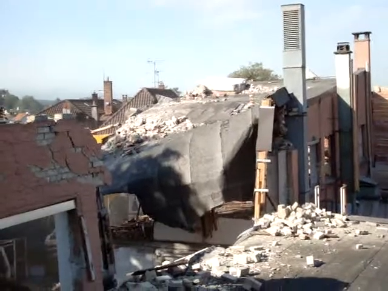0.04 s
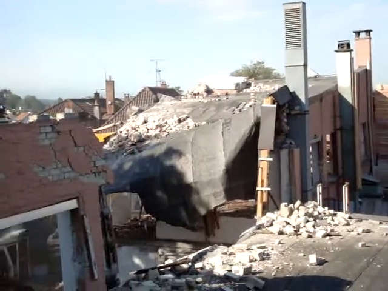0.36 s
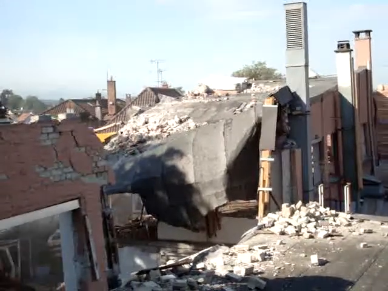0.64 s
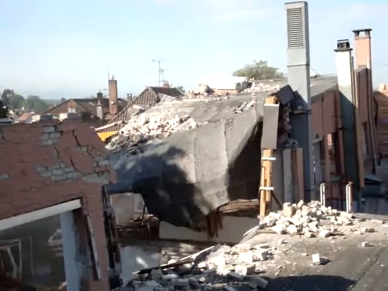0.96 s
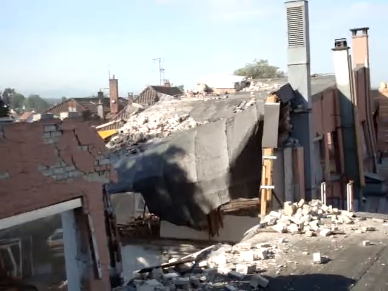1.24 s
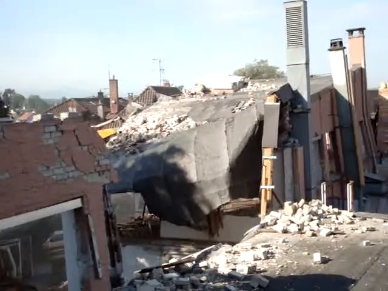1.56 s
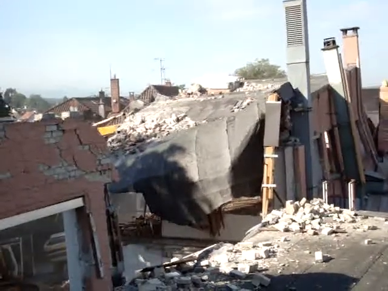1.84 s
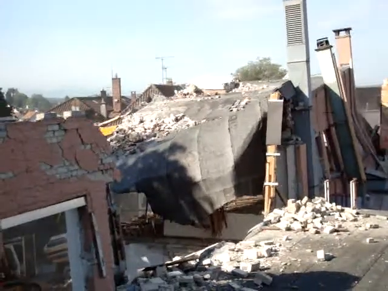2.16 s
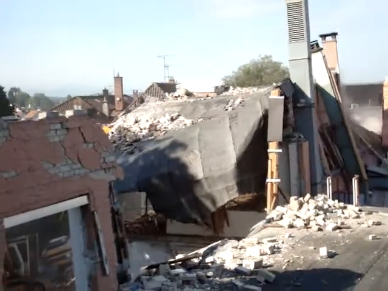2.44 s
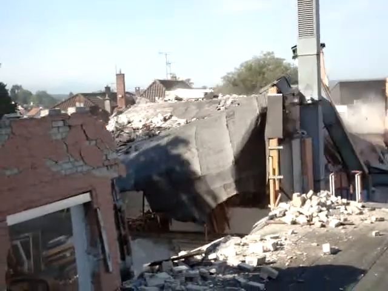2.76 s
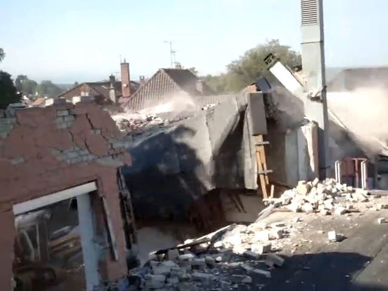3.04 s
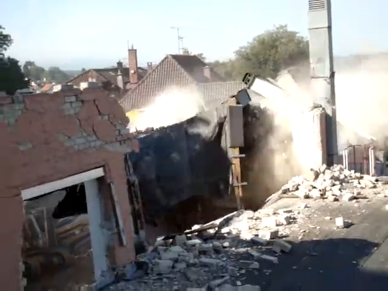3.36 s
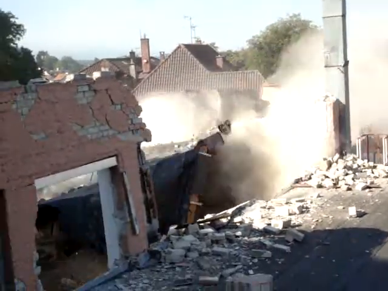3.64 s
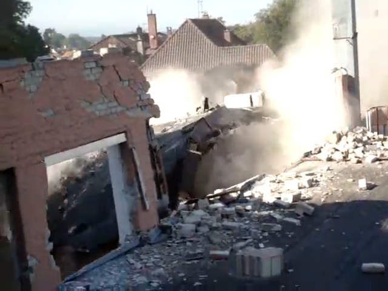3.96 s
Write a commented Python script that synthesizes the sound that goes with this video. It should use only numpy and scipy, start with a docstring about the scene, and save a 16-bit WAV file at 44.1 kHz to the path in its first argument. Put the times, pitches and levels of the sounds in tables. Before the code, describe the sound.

A brick building collapses outdoors. Rubble slides while timbers crack and a metal sheet crashes and scrapes over a faint excavator drone. Then louder surges of clinking bricks and dull thuds follow, caught by one nearby microphone.

```python
"""On a roof near a demolition site, an excavator pulls down a brick building.
Over the wavering engine drone, timbers crack and splinter, and a metal sheet crashes down, rings
and scrapes on. Then walls and roof give way in surges of rubble: a gritty wash full of ringing
stones and clinking bricks, with landing blocks, dull thuds and the rumble of the shaking structure.
One microphone, outdoors; gain control ducks the loud moments."""
import sys
import numpy as np
from scipy import signal
from scipy.fft import rfft, irfft
from scipy.io import wavfile

SR = 44100
rng = np.random.default_rng(int(sys.argv[2]) if len(sys.argv) > 2 else 0)


def store_pcm(level_fs):
    """Save levels as 16-bit WAV."""
    pcm = np.round(np.clip(level_fs, -1, 1) * 32767).astype(np.int16)
    wavfile.write(sys.argv[1], SR, np.atleast_2d(pcm).T)


N = 176400
TIME = np.arange(N) / SR
BIN_HZ = np.arange(N // 2 + 1) * SR / N

# surges of the sliding rubble: t/s, mid level/dB, upper-mid level/dB, treble level/dB
RUBBLE_SURGES = [(0, -28.5, -27.5, -37), (0.5, -29.5, -30.5, -37.5), (0.95, -31, -29, -39),
                 (1.15, -29, -28.5, -34), (1.3, -25, -26, -34.5), (1.5, -28, -28, -35.5),
                 (1.75, -28.3, -28.5, -36.5), (2.08, -27.5, -26, -36), (2.199, -21.5, -23.5, -32.5),
                 (2.55, -21, -22.5, -33.5), (2.641, -27.5, -23.5, -36), (2.72, -21.5, -23.5, -35),
                 (2.861, -22, -22.5, -33.5), (2.95, -19.5, -18, -29), (3.118, -22, -19.5, -33.5),
                 (3.21, -23.5, -21, -34), (3.39, -20, -18, -30), (3.52, -26, -24, -36),
                 (3.62, -18.5, -18, -31.5), (3.76, -21, -20, -33), (3.93, -26, -22.5, -36),
                 (4.0, -26, -20, -35)]
# spectrum of the rubble: f/Hz, level/dB
RUBBLE_COLOUR = [(130, -13), (175, -12.5), (240, -11), (310, -5.5), (430, -4.5), (850, -0.5), (1320, -1.3),
                 (1600, -5), (1900, -5), (2600, -4.5), (3200, -5.5), (4500, -10), (6200, -12.5),
                 (8000, -21), (10000, -30)]
# spectrum of breaking wood: f/Hz, level/dB
WOOD_COLOUR = [(300, -52), (1500, -15.5), (2300, 5.5), (3050, 9), (4100, 4.5), (4400, 4), (5200, 0),
               (6500, -11.5), (7700, -7.5), (10000, -18.5)]

# contact textures, from coarse to fine
FRAGMENTS = dict(per_s=190, spread_db=-3)
STONES = dict(per_s=640, spread_db=-3.5)
SPLINTERS = dict(per_s=660, spread_db=4, t60=0.017, share=0.19)


def rubble():
    """Sliding masonry: a gritty wash of fragments with ringing stones in it, in three size ranges."""
    bands = [(130, 1500), (1500, 4500), (4500, 11000)]  # band of each size range: low f/Hz, high f/Hz
    trims = [-0.11, -0.5, 4.5]  # trim of each band: level/dB
    grit_shares = [0.18, 0.11, 0.6]  # grittiness of each band: share of the wash's power
    grit = clatter(**FRAGMENTS, t60=0.037, share=0.68)
    out = 0
    for (low, high), level_db, trim_db, share in zip(bands, in_time(RUBBLE_SURGES), trims, grit_shares):
        edges = np.geomspace(low, high, 5)
        wash = sum(noise(RUBBLE_COLOUR, a, b) * from_db(1.46 * drift(rate_hz=43))
                   for a, b in zip(edges, edges[1:]))  # each slice flickers on its own
        gritty_wash = rms_one(wash) * np.sqrt(1 - share + share * grit ** 2)
        out += from_db(level_db + trim_db) * rms_one(gritty_wash + from_db(-7) * stones(low, high))
    return out


def stones(low, high, count=30, t60_cycles=67):
    """Pieces of brick and tile collide and ring briefly, each at its own pitch."""
    contacts = clicks(**STONES)
    struck_piece = rng.integers(0, count, N)
    pitches = low * (high / low) ** ((np.arange(count) + rng.random(count)) / count)
    out = 0
    for piece, hz in enumerate(pitches):
        ringing = ring(contacts * (struck_piece == piece), hz, t60_cycles / hz)
        out += hz * from_db(at_hz(RUBBLE_COLOUR, hz)) * ringing
    return rms_one(out)


def bricks():
    """Whole bricks clink together, standing out in the heaviest surges."""
    modes = [(2470, -1), (2880, 0)]  # brick resonances: f/Hz, level/dB
    upper_mid_db = in_time(RUBBLE_SURGES)[1]
    return from_db(7.5 + 1.77 * upper_mid_db) * rms_one(pelted_modes(modes, t60=0.0072))


def masonry_blocks():
    """Blocks of masonry land with a hard, midrange crunch."""
    hits = [(0, -19.5, 0.13), (1.583, -14.5, 0.059), (2.156, -14, 0.14), (2.376, -25, .14),
            (2.53, -23, 0.22), (2.684, -20, .15), (2.976, -14, 0.17), (3.044, -20, 0.064),
            (3.087, -12.5, 0.097), (3.761, -17, 0.12), (3.982, -16.5, 0.15)]  # block landings: t/s, level/dB, T60/s
    colour = [(100, -28), (300, -9), (850, 3.5), (1250, 7.5), (1800, -5), (3000, -16.5), (9000, -26.5)]  # impact spectrum: f/Hz, level/dB
    return landings(hits, colour, attack=0.001)


def thuds():
    """Heavy parts hit the ground with a dull, soft-edged thump."""
    hits = [(2.785, -30, 0.37), (3.008, -25, 0.14)]  # ground impacts: t/s, level/dB, T60/s
    colour = [(25, -21), (60, -9), (110, -9.5), (160, 7), (200, 6), (400, -46)]  # thud spectrum: f/Hz, level/dB
    return landings(hits, colour, attack=0.026)


def timbers():
    """A timber parts with a sudden fracture, then splinters; each has its own share of treble."""
    cracks = [(.174, -25.5, 0.089, -5), (.7138, -19, 0.036, 4), (.799, -23.5, 0.046, -9),
              (.8465, -21, 0.057, 3), (1.0264, -19, 0.047, 2), (1.0869, -24.5, .03, 6),
              (1.1166, -19, 0.051, 0), (1.154, -24, 0.021, -7), (1.1727, -16.5, 0.037, 0.5),
              (1.2282, -22, 0.043, 8), (1.5795, -20, 0.041, 3.5), (1.599, -24, 0.04, 5),
              (2.5307, -19, 0.11, -1), (2.733, -20, 0.11, 1.5), (2.9167, -21.5, 0.12, -3),
              (3.417, -13, 0.03, -13)]  # breaking timbers: t/s, level/dB, T60/s, treble shelf/dB
    attack_s, shelf_hz = 0.0004, 5000
    wood = rms_one(noise(WOOD_COLOUR))
    treble = irfft(rfft(wood) * (BIN_HZ > shelf_hz), N)
    splinters = clatter(**SPLINTERS)
    out = 0
    for start, db, t60, treble_db in cracks:
        fracture = from_db(-2.5) * blow(start, attack_s, t60=0.0063)
        splintering = splinters * blow(start, attack_s, t60, hold=0.2 * t60)
        tone = wood + (from_db(treble_db) - 1) * treble
        out += from_db(db) * np.hypot(fracture, splintering) * tone
    return out


def sheet_metal():
    """The sheet lands in a burst of contacts, rattles and rings out, its low modes longest."""
    modes = [(339, -4.5), (571, -1), (790, -2), (1052, -6), (1107, -2), (1292, -8), (1457, 1.5),
             (2008, -3.5), (2126, -2), (2412, -0.5)]  # sheet resonances: f/Hz, level/dB
    colour = [(200, -23), (560, -10.5), (900, -8.5), (1130, 0.5), (1350, -5), (1600, -19), (2400, -8),
              (3200, -17.5), (9000, -55)]  # rattle spectrum: f/Hz, level/dB
    envelope = blow(start=0.572, attack=0.04, t60=0.92)
    contacts = clicks(per_s=830, spread_db=5) * envelope
    ringing = 0
    for hz, db in modes:
        mode = ring(contacts, hz, t60=0.38 / np.sqrt(hz / 1000))
        ringing += from_db(db) * rms_one(flex(mode))
    ringing = np.sqrt(np.mean(envelope ** 2)) * rms_one(ringing)
    rattle = envelope * rms_one(noise(colour)) * clatter(**SPLINTERS)
    return from_db(-14.5) * rattle + from_db(-19.5) * ringing


def flex(mode, pitch_spread=0.0032):
    """A bending sheet pulls the pitch of a mode up and down."""
    warp_s = pitch_spread * np.cumsum(drift(rate_hz=17)) / SR
    return np.interp(TIME + warp_s, TIME, mode)


def sheet_scrape():
    """The fallen sheet drags over the rubble."""
    colour = [(150, -37), (900, -13), (1400, -3), (1700, 8), (2300, -0.5), (3000, -15.5), (5000, -58)]  # scrape spectrum: f/Hz, level/dB
    grit = clatter(**FRAGMENTS, t60=0.017, share=0.48)
    envelope = blow(start=0.597, attack=0.1, t60=1.87)
    return from_db(-25) * envelope * grit * rms_one(noise(colour))


def laths():
    """Small laths snap at random throughout, riding the level of the fine rubble."""
    snaps = clatter(per_s=60, spread_db=-8, t60=0.11, share=0.61)
    treble_db = in_time(RUBBLE_SURGES)[2]
    return from_db(treble_db - 0.5) * snaps * rms_one(noise(WOOD_COLOUR, low=3500))


def structure():
    """The shaking building rumbles, and the rubble stirs its hollow notes."""
    hollow_modes = [(560, -14.5), (840, -16.5), (940, -12.5), (1300, -11.5)]  # resonances of the structure: f/Hz, level/dB
    swells = [(0, -39.5), (.45, -38), (.55, -33.5), (.68, -41), (2.65, -40), (2.85, -35.5), (3.15, -39),
              (3.7, -45.5), (4, -60)]  # rumble envelope: t/s, level/dB
    colour = [(20, -17), (40, -12), (68, -24), (90, -6), (118, 0.5), (135, -1.5), (155, -9), (180, 3),
              (260, 5), (500, -27)]  # rumble spectrum: f/Hz, level/dB
    mid_db = in_time(RUBBLE_SURGES)[0]
    hollow = from_db(mid_db) * pelted_modes(hollow_modes, t60=0.054)
    rumble = from_db(in_time(swells)[0]) * rms_one(noise(colour))
    return hollow + rumble


def excavator(waver_hz=1, waver_db=0.3):
    """A wavering engine note with orders an octave below and a fifth above."""
    drone = [(0, 215, -41.5, -52), (.3, 212.5, -39, -45), (.57, 209.5, -32, -51), (.66, 209.3, -43.5, -45),
             (.9, 209.5, -36, -42), (1.45, 211.4, -35.5, -51.5), (1.8, 208.8, -39, -41.5),
             (2.14, 207.8, -39.5, -40), (2.2, 209.8, -45.5, -36.5), (4, 208.6, -60, -64)]  # engine note: t/s, f/Hz, level/dB, level of the fifth/dB
    hz, level_db, fifth_db = in_time(drone)
    phase = 2 * np.pi * np.cumsum(hz + waver_hz * drift(rate_hz=12)) / SR
    orders = [(0.5, level_db - 24), (1, level_db), (1.5, fifth_db)]
    return np.sqrt(2) * sum(from_db(db - waver_db * drift(rate_hz=17)) * np.sin(order * phase)
                            for order, db in orders)


def landings(hits, colour, attack):
    """Each landing is a quick, dying run of splintering contacts."""
    envelope = sum(from_db(db) * blow(start, attack, t60) for start, db, t60 in hits)
    return envelope * rms_one(noise(colour)) * clatter(**SPLINTERS)


def pelted_modes(modes, t60):
    """Resonances, each kept ringing by its own hail of stones."""
    return sum(from_db(db) * rms_one(ring(clicks(**STONES), hz, t60)) for hz, db in modes)


def clicks(per_s, spread_db):
    """Random contacts: most near unit size, a few louder (positive spread) or softer (negative)."""
    size = np.minimum(rng.exponential(1, N), 4)
    return (rng.random(N) < per_s / SR) * from_db(spread_db * size) * rng.choice([-1, 1], N)


def clatter(per_s, spread_db, t60, share):
    """Envelope of mean power 1: a share comes from sudden, dying contacts, the rest is steady."""
    decay = from_db(-60 / (t60 * SR))
    power = signal.lfilter([1], [1, -decay ** 2], clicks(per_s, spread_db) ** 2 + 1e-18)
    return np.sqrt(1 - share + share * power / power.mean())


def ring(x, hz, t60):
    """One mode set ringing by x; it radiates no deep bass."""
    r, w = from_db(-60 / (t60 * SR)), 2 * np.pi * hz / SR
    return signal.lfilter([.5, 0, -.5], [1, -2 * r * np.cos(w), r * r], x + 1e-18)


def blow(start, attack, t60, hold=0):
    """Hit envelope: linear attack, hold, exponential decay; times in seconds."""
    age = TIME - start
    return np.clip(age / attack, 0, 1) * from_db(-60 * np.clip((age - attack - hold) / t60, 0, 2))


def noise(colour, low=0, high=SR):
    """Noise of a given colour between two frequencies."""
    spectrum = rfft(rng.standard_normal(N)) * from_db(at_hz(colour, BIN_HZ))
    return irfft(spectrum * (BIN_HZ >= low) * (BIN_HZ < high), N)


def drift(rate_hz):
    """Smooth random modulation with rms 1."""
    spectrum = rfft(rng.standard_normal(N)) * (BIN_HZ > 0)
    return rms_one(irfft(spectrum / (1 + (BIN_HZ / rate_hz) ** 2), N))


def in_time(rows):
    """The columns of a breakpoint curve at every sample."""
    times, *columns = np.transpose(rows)
    return [np.interp(TIME, times, column) for column in columns]


def at_hz(colour, hz):
    """Read a spectrum on a log-frequency axis."""
    f, db = np.transpose(colour)
    return np.interp(np.log(np.maximum(hz, 1)), np.log(f), db)


def from_db(db):
    """Decibels to gain."""
    return 10 ** (np.asarray(db) / 20)


def rms_one(x):
    """Scale to rms 1."""
    return x / np.sqrt(np.mean(x ** 2) + 1e-20)


def gain_control(x, threshold_db=-16, slope=0.24, attack_s=0.0035, release_db_per_s=40):
    """Loud moments duck the gain; it creeps back afterwards."""
    r = np.exp(-1 / (attack_s * SR))
    level_db = 10 * np.log10(signal.lfilter([1 - r], [1, -r], x ** 2) + 1e-12)
    duck_db = slope * np.maximum(level_db - threshold_db, 0)
    creep_db = release_db_per_s * TIME
    return x * from_db(creep_db - np.maximum.accumulate(duck_db + creep_db))


def scene():
    """All sources, the same in both channels."""
    hits = timbers() + masonry_blocks() + thuds()
    bed = rubble() + bricks() + structure() + excavator()
    return np.tile(hits + bed + sheet_metal() + sheet_scrape() + laths(), (2, 1))


def record(dry, ceiling=0.52, low_cut_hz=60, high_cut_hz=10100):
    """Gain control, rounded peaks, a thin bass and a cut top."""
    ducked = np.array([gain_control(channel) for channel in dry])
    rounded = ceiling * np.tanh(ducked / ceiling)
    low_cut = signal.butter(2, low_cut_hz, "high", fs=SR, output="sos")
    high_cut = signal.ellip(12, .2, 80, high_cut_hz, fs=SR, output="sos")
    return signal.sosfilt(high_cut, signal.sosfilt(low_cut, rounded))


dry = scene()
out = record(dry)
store_pcm(out)
```